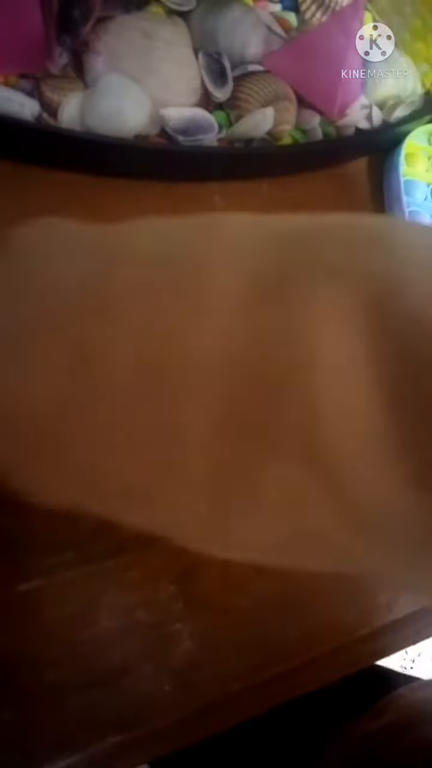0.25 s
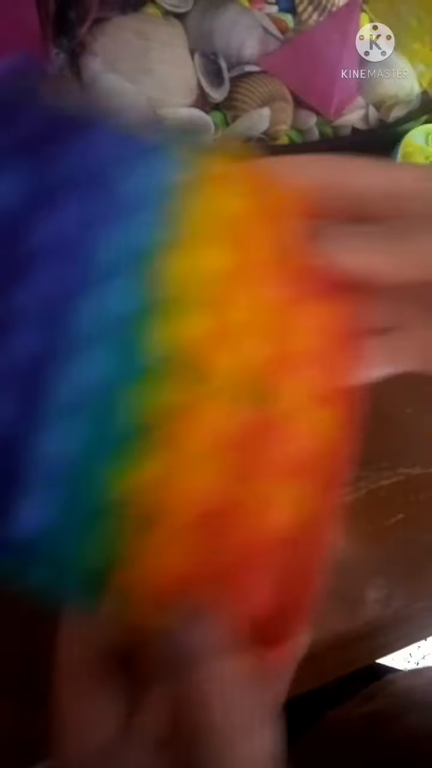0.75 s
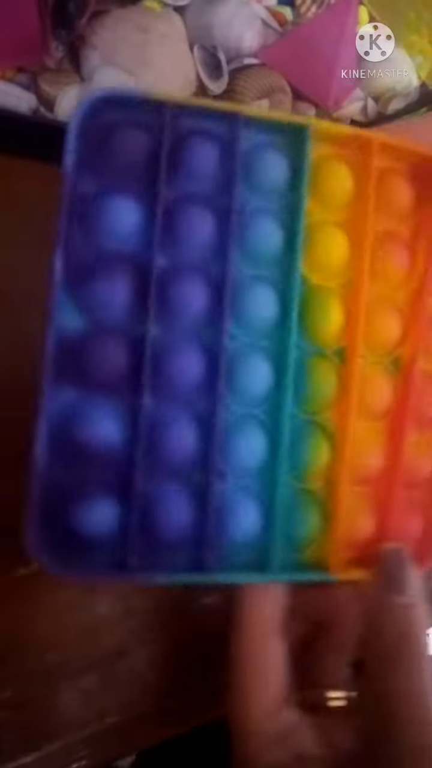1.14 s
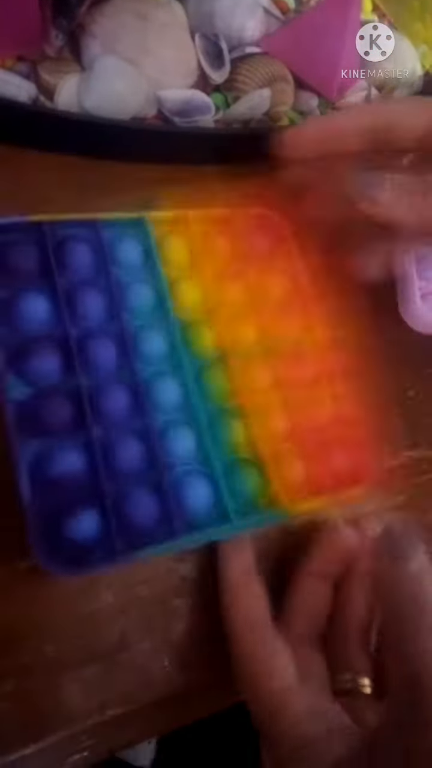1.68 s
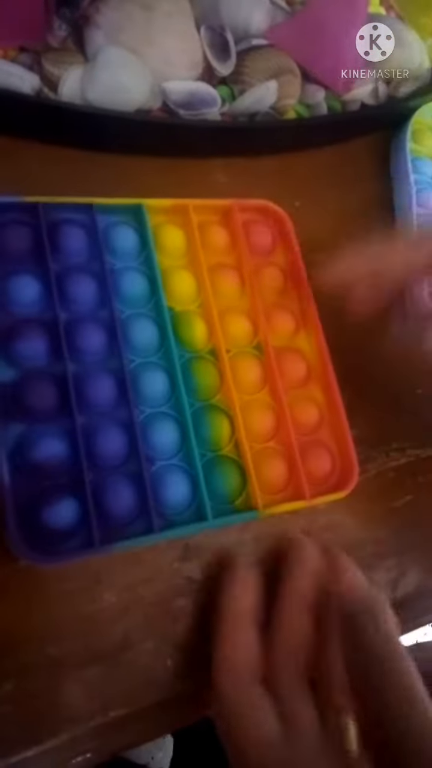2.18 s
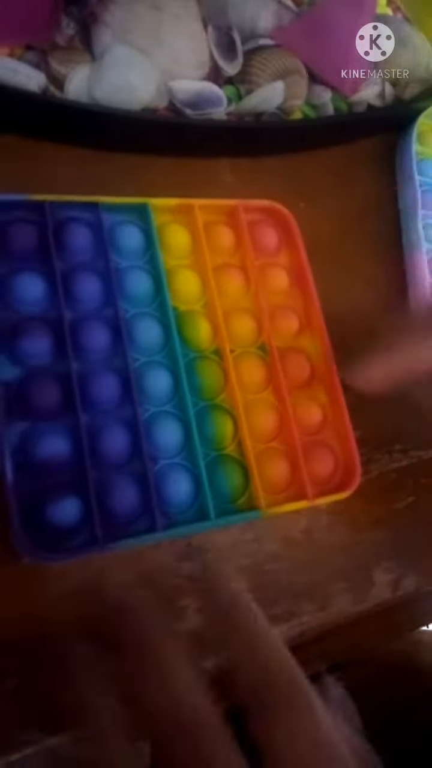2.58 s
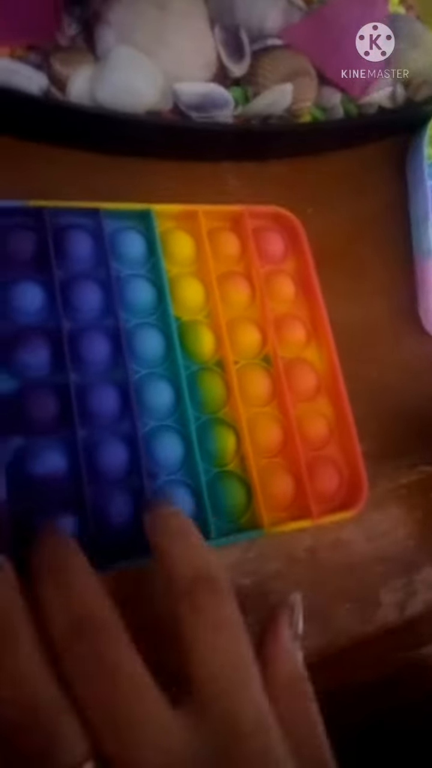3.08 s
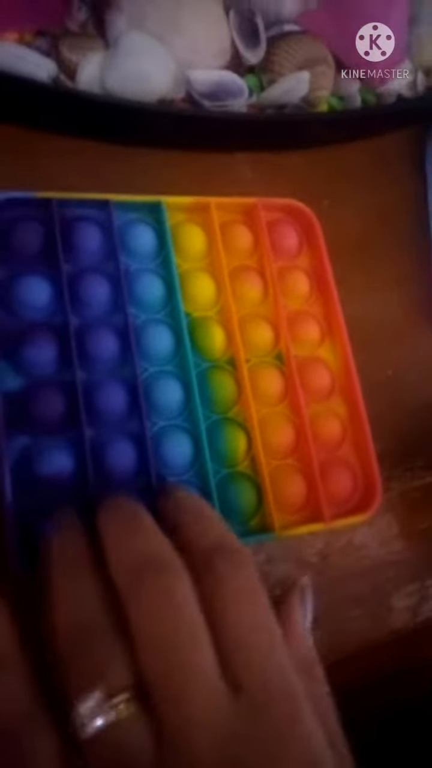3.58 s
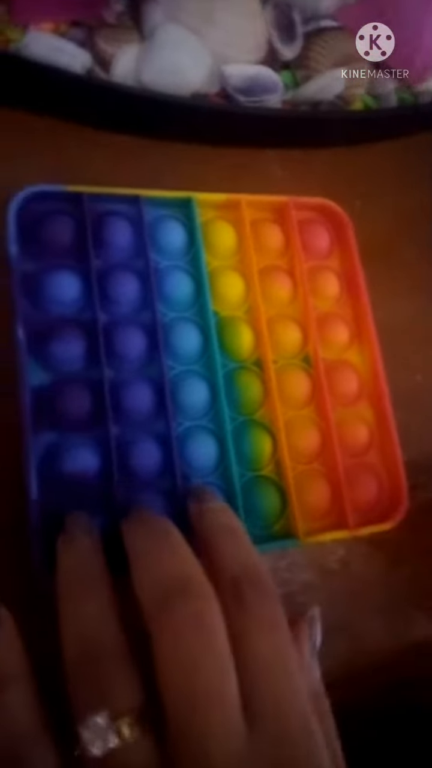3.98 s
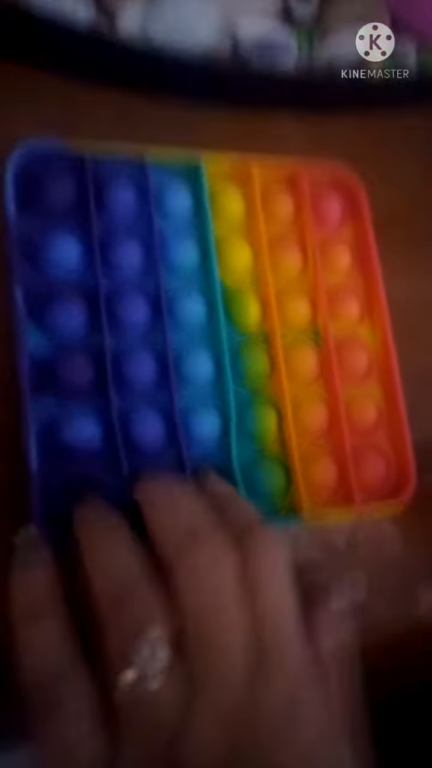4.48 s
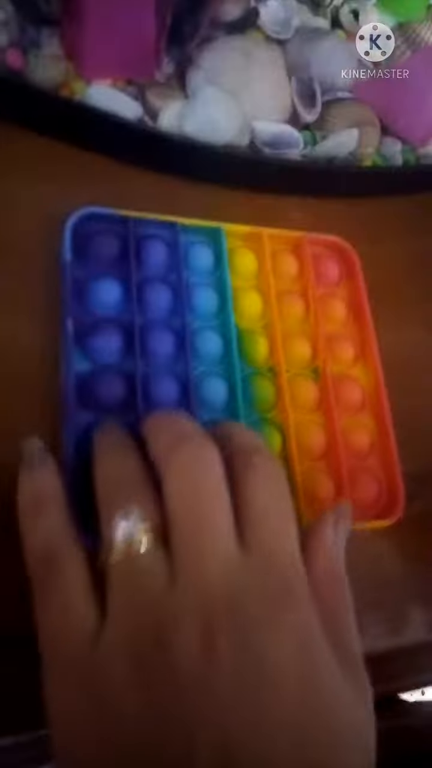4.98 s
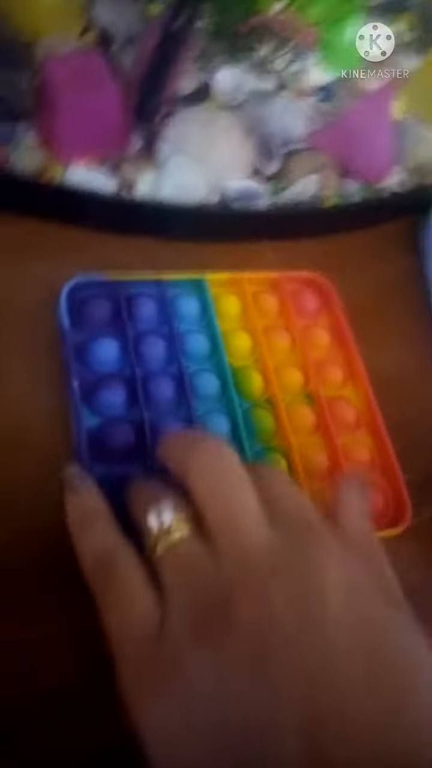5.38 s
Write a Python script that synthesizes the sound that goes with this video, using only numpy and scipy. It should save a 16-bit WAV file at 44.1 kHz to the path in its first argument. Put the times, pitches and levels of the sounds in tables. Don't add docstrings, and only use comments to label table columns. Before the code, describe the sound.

A rubbery toy squeaks while dragged off a wooden table, slaps down loudly, then its domes pop in two soft bursts.

```python
import sys
import numpy as np
from scipy import signal
from scipy.io import wavfile
from scipy.ndimage import uniform_filter1d

SR = 44100
rng = np.random.default_rng(int(sys.argv[2]) if len(sys.argv) > 2 else 0)


def field_ratio(decibels):
    return 10 ** (np.asarray(decibels, dtype=float) / 20)


def put_to_file(sound):
    columns = np.atleast_2d(sound).T
    safe = np.clip(columns, -1, 1)
    whole_steps = np.round(safe * 32767)
    wavfile.write(sys.argv[1], SR, whole_steps.astype(np.int16))


N = 248724


def evened(x):
    return x / np.sqrt(np.mean(x ** 2) + 1e-20)


def read(points, hz):
    f, value = np.transpose(points)
    return np.interp(np.log(hz + 1), np.log(f + 1), value)


def add(mix, start_s, sound):
    part = mix[round(start_s * SR):][:len(sound)]
    part += sound[:len(part)]


def unroll(rows):
    s, *columns = np.transpose(rows)
    t = np.arange(s[0], s[-1], 1 / SR)
    window = signal.windows.tukey(len(t), min(0.011 / (s[-1] - s[0]), 1))
    return s[0], window, [np.interp(t, s, column) for column in columns]


def noise(spectrum, count, patchy_db=2.0):
    hz = np.fft.rfftfreq(1024, 1 / SR)
    a, b, patches = rng.standard_normal((count // 256 + 5, 513, 3)).T
    patches = uniform_filter1d(patches, size=10, axis=0)
    patches = evened(uniform_filter1d(patches, size=12, axis=1))
    z = (a + 1j * b) * field_ratio(read(spectrum, hz)[:, None] + patchy_db * patches)
    return evened(signal.istft(z, nperseg=1024, noverlap=768)[1][:count])


def wander(count, size):
    drift = uniform_filter1d(rng.standard_normal(count), size=size)
    return evened(uniform_filter1d(drift, size=size))


def swell(start_s, length_s, peak_db, place, end_db):
    u = np.linspace(0, 1, 9)
    place = np.clip(place, 0.05, 0.95)
    away = np.where(u < place, 1 - u / place, (u - place) / (1 - place))
    return start_s + length_s * u, peak_db + end_db * away ** 2


def stroke(start_s, length_s, peak_db, place, *steady):
    s, db = swell(start_s, length_s, peak_db, place, end_db=-11.5)
    return np.transpose([s, db] + [value + 0 * s for value in steady])


def glide(start_s, length_s, first_hz, last_hz, peak_db, place):
    s, db = swell(start_s, length_s, peak_db, place, end_db=-5.5)
    return np.transpose([s, np.linspace(first_hz, last_hz, len(s)), db])


def whine(rows, waver, flutter_db, size):
    start_s, window, (hz, db) = unroll(rows)
    phase = 2 * np.pi * np.cumsum(hz * (1 + waver * wander(len(hz), size=size))) / SR
    level = field_ratio(db + flutter_db * wander(len(hz), size=size))
    return start_s, np.sqrt(2) * level * np.sin(phase) * window


def microphone_hiss():
    # hz, level_db per Hz
    hiss_colour = [(590, -33), (1000, -10.5), (1080, -0.5), (1240, -1), (1530, -11.5), (1700, -2.5),
                   (2080, -27.5), (2230, -10), (2650, -12), (2910, -9), (6420, -9), (8160, -22.5),
                   (13400, -21.5), (14700, -12.5), (15500, -8)]
    return field_ratio(-67 - 3.0) * noise(hiss_colour, N, patchy_db=0.6)


def street():
    # time_s, level_db
    traffic = [
        (0.0, 0),
        (1.6, -2),
        (2.3, -3),
        (4.3, -4.5),
        (4.6, -2),
        (5.64, -3),
    ]
    # hz, level_db per Hz
    street_colour = [(20, -42.5), (80, -18.5), (130, 0), (177, -1.5), (271, -3.5), (439, -10), (580, -12),
                     (700, -16), (1400, -22.5), (2060, -22.5), (3500, -27), (5960, -39.5), (8500, -65),
                     (11000, -80)]
    # hz, level_db per Hz
    rumble_colour = [(30, -20), (45, -3), (60, 0), (75, -2), (110, -9.5), (140, -35), (200, -53.5)]
    traffic_db = np.interp(np.arange(N) / SR, *np.transpose(traffic))
    out = field_ratio(-55.5 + traffic_db) * noise(street_colour, N, patchy_db=1)
    return out + field_ratio(-56.5 + 1.2 * traffic_db) * noise(rumble_colour, N, patchy_db=2.0)


def far_engine():
    # start_s, length_s, first_hz, last_hz, peak_db
    hums = [(2.268, 0.46, 208, 215, -59.5), (2.741, 0.7, 216.6, 223.6, -53.5),
            (3.598, 0.8, 217.3, 223, -56.5), (4.598, 0.3, 224.5, 229, -61),
            (.75, 0.46, 172.8, 171.6, -64.5), (1.26, 0.47, 170.1, 166.4, -58.5),
            (2.45, 1.14, 142, 146.3, -60.5), (0.0, 0.24, 101.8, 100, -55.5),
            (0.476, 0.56, 103.6, 104.9, -61), (1.326, 0.12, 99, 98, -55.5),
            (1.948, 0.43, 106.4, 105, -59.5), (2.398, 0.27, 106.7, 109.1, -63)]
    out = np.zeros(N)
    for row in hums:
        add(out, *whine(glide(*row, place=0.82), waver=0.008, flutter_db=0.5, size=2000))
    return out


def insects():
    # start_s, length_s, first_hz, last_hz, peak_db
    chirps = [
        (2.67, .16, 4630, 4720, -77),
        (2.72, 0.19, 4700, 4640, -72),
        (2.9, .1, 4720, 4640, -77),
        (3.22, 0.17, 4640, 4680, -75),
        (3.33, 0.14, 4720, 4740, -75),
        (0.352, 0.047, 4900, 4950, -80),
    ]
    low_chirp = (3.38, .23, 4480, 4495, -76.5)
    out = np.zeros(N)
    for row in chirps:
        add(out, *whine(glide(*row, place=0.28), waver=0.009, flutter_db=4.0, size=120))
    add(out, *whine(glide(*low_chirp, place=0.28), waver=0.003, flutter_db=5, size=200))
    return out


def finger_whistle():
    # start_s, length_s, first_hz, last_hz, peak_db
    whistles = [
        (2.93, 0.092, 1970, 1927, -72.5),
        (3.08, 0.11, 1905, 1900, -75),
        (3.23, 0.11, 1930, 1910, -73),
    ]
    out = np.zeros(N)
    for row in whistles:
        add(out, *whine(glide(*row, place=0.28), waver=0.009, flutter_db=4.0, size=120))
    return out


def rub(rows):
    # hz, level_db per Hz
    dull_colour = [(400, -23.5), (900, 3), (1500, -12.5), (1900, 1.5), (2300, 0.5), (2900, -0.5),
                   (3500, -5.5), (4300, -3.5), (4700, -33.5), (6500, -39), (9000, -50)]
    bright_colour = [(120, -57), (200, -3), (253, -15.5), (358, 1), (479, -4), (677, 0), (957, -4),
                     (1910, -2), (3180, -14), (6130, -10), (8510, -25.5), (13400, -26.5), (14700, -13),
                     (15500, -18.5)]
    start_s, window, (db, bright) = unroll(rows)
    dull = noise(dull_colour, len(db), patchy_db=1)
    sharp = noise(bright_colour, len(db), patchy_db=1)
    level = field_ratio(db + 0.18 * wander(len(db), size=200))
    return start_s, level * ((1 - bright) * dull + bright * sharp) * window


def hand_rubs():
    # start_s, length_s, peak_db, peak_place (0-1), brightness (0-1)
    strokes = [
        (0.478, 0.17, -66, 0.1, 0),
        (0.681, 0.67, -63.5, 0.18, 0.23),
        (2.92, 0.32, -64.5, 0, 0.18),
        (3.14, 0.36, -64.5, 0.3, 0.3),
        (5.165, 0.49, -62, 0.3, 0.58),
    ]
    # time_s, level_db, brightness (0-1)
    last_sweep = [
        (5.38, -62, 0.6),
        (5.43, -51.5, 0.58),
        (5.5, -51.5, 0.67),
        (5.56, -45, 0.7),
        (5.64, -57.5, 0.52),
    ]
    out = np.zeros(N)
    for rows in [stroke(*row) for row in strokes] + [last_sweep]:
        add(out, *rub(rows))
    return out


def clicks():
    # time_s, level_db, pitch_hz, t60_s (time to fall by 60 dB)
    click_rows = [(.303, -48, 1300, .04), (.311, -54, 1520, .04), (.3725, -48, 600, 0.02),
                  (1.7452, -31, 3240, .02), (1.7445, -38, 4800, .015), (1.7595, -34.5, 2190, .025),
                  (1.7595, -42, 3600, .01), (4.4652, -28, 2020, 0.016), (4.4651, -33, 3180, .015),
                  (4.4652, -36, 4970, .012), (4.4693, -37.5, 2980, 0.012), (4.4765, -29, 5150, 0.012),
                  (4.476, -37, 4330, .012), (4.563, -43, 2300, .005), (4.706, -49, 3020, .004),
                  (4.762, -52, 4000, 0.0045), (4.9105, -50, 2300, .005), (5.137, -40.5, 4490, 0.014),
                  (5.1385, -42.5, 5290, .012), (5.145, -47, 3330, 0.018), (5.135, -42, 2900, .01),
                  (5.3464, -34.5, 5090, 0.0069), (5.347, -47, 3000, 0.013), (5.349, -53, 2100, .015),
                  (5.3515, -53, 5800, .01), (5.3855, -45, 4500, 0.0034)]
    out, t = np.zeros(N), np.arange(1500) / SR
    for s, db, hz, t60 in click_rows:
        fade = field_ratio(db - 60 * t / t60) * np.minimum(t / 0.00064, 1)
        add(out, s, fade * np.sin(2 * np.pi * hz * t))
    return out


def lingering_rings():
    # time_s, level_db, pitch_hz, t60_s
    ring_rows = [(1.75, -35, 1130, .6), (1.755, -39, 1210, .5), (1.75, -36, 1315, .3),
                 (1.76, -36, 1012, .4), (1.76, -35, 410, .4), (1.75, -30, 723, .25), (1.75, -30, 804, .15),
                 (1.76, -33, 499.4, .37), (1.76, -36, 643, .45), (1.76, -47, 1870, .44),
                 (4.466, -30.5, 93, .3), (4.518, -30, 96, .36), (4.48, -37, 431, .4), (4.48, -36, 454, .3),
                 (4.48, -38.5, 532, .43), (4.48, -40.5, 779, .35), (4.52, -42, 933, .25),
                 (4.52, -40.5, 1105, .25), (4.52, -42, 1420, .08), (5.137, -28, 94.4, .22),
                 (5.15, -35, 531.7, .35), (5.15, -37, 565.4, .3), (5.15, -41, 708, .21),
                 (5.15, -43.5, 855, .3), (5.15, -48, 2085, .22), (5.19, -46, 1030, .12),
                 (5.19, -48, 1230, .12), (5.15, -44.5, 296, .5)]
    out, t = np.zeros(N), np.arange(30000) / SR
    for s, db, hz, t60 in ring_rows:
        throb_db = 4.5 * min(hz / 400, 1) ** 2 * wander(len(t), size=350)
        build = 1 - np.exp(-t / 0.008)
        add(out, s, field_ratio(db + throb_db - 60 * t / t60) * np.sin(2 * np.pi * hz * t) * build)
    return out


def tails(colour, build_s, count):
    # hz, t60_s
    room_t60 = [(80, 0.85), (250, 0.68), (600, 0.7), (1200, 0.68), (2200, 0.67), (3700, 0.5), (4600, .4),
                (7000, 0.27)]
    taps = np.zeros((count, SR))
    at = np.arange(300, SR - 20, 20)
    places = at + rng.integers(0, 20, (count, len(at)))
    np.put_along_axis(taps, places, rng.choice([-1., 1.], (count, len(at))), 1)
    hz, t, z = signal.stft(taps, SR, nperseg=512)
    fade = field_ratio(read(colour, hz)[:, None] - 60 * t / read(room_t60, hz)[:, None])
    tail = signal.istft(z * fade * np.minimum(t / build_s, 1), SR, nperseg=512)[1]
    return tail / np.linalg.norm(tail, axis=1)[:, None]


def room(train, colour, build_s):
    out, answers = np.zeros(N), tails(colour, build_s, count=5)
    for k, at in enumerate(np.flatnonzero(train)):
        add(out, at / SR, train[at] * answers[k % len(answers)])
    return out


def booming(rows, boom_db):
    return [(*row, boom_db) for row in rows]


def dome_puff(t, hz, t60):
    turns = hz * t + 0.21 * (1 - np.exp(-t * hz / 0.33))
    dome = -np.sin(2 * np.pi * turns) * field_ratio(-60 * t / t60) * (1 - np.exp(-(t * hz / 0.28) ** 2))
    return dome / abs(dome).max()


def wood_boom(t, modes):
    out = np.zeros(len(t))
    for hz, db, t60 in modes:
        share, detune = rng.standard_normal(2)
        out += field_ratio(db + 2.2 * share - 60 * t / t60) * np.sin(2 * np.pi * hz * (1 + 0.0095 * detune) * t)
    return out * np.minimum(t / 0.0023, 1)


def blows(rows, modes, snap_colour, snap_t60):
    body, air, train = np.zeros(N), np.zeros(N), np.zeros(N)
    t = np.arange(18000) / SR
    snap_t = t[:2048]
    for s, db, hz, snap_db, t60, boom_db in rows:
        snap = noise(snap_colour, 2048, patchy_db=-1.5)
        snap *= field_ratio(-60 * snap_t / snap_t60) * np.minimum(snap_t / 0.00076, 1)
        add(body, s, field_ratio(db) * (dome_puff(t, hz, t60) + field_ratio(boom_db) * wood_boom(t, modes)))
        add(air, s, field_ratio(snap_db + 7.0) * snap)
        train[round(s * SR)] = field_ratio(db)
    soft = signal.butter(6, 4500, fs=SR, output="sos")
    return signal.sosfilt(soft, body) + air, train


def slap_down():
    # time_s, dome_db, dome_hz, snap_db, dome_t60_s
    nudges = [
        (.1365, -37, 216, -74, 0.085),
        (.137, -52, 1120, -70.5, .012),
        (.1625, -43.5, 240, -63, 0.09),
        (.553, -38.5, 207, -59, 0.24),
        (1.372, -47.5, 200, -77, 0.016),
        (2.745, -50, 250, -90, 0.044),
    ]
    slap = [
        (1.7415, -47.5, 497, -57, 0.0094),
        (1.7434, -6.5, 1100, -43, 0.012),
        (1.7449, -13, 800, -48.5, 0.025),
        (1.7452, -20, 1360, -53.5, .025),
        (1.7494, -13, 1290, -40, 0.012),
        (1.7515, -18, 290, -46.5, .04),
        (1.7583, -16.5, 296, -37, 0.03),
        (1.7652, -22, 296, -59, 0.035),
        (1.7551, -12, 900, -49.5, .008),
    ]
    bounces = [
        (1.792, -21.5, 314, -54, 0.0068),
        (1.882, -31, 296, -69.5, 0.29),
        (1.893, -48, 296, -59.5, .069),
        (1.94, -40, 296, -68, 0.051),
        (2.03, -43.5, 300, -81, 0.19),
    ]
    # pitch_hz, level_db, t60_s
    wood = [(94.5, -20, 0.47), (200, -10, 0.075), (296, -8.5, 0.11), (432, -6, 0.056), (494, -9, 0.069),
            (610, -18.5, 0.11), (721, -5, 0.022), (800, -9, 0.042), (1155, -1.5, 0.036),
            (1415, -12.5, 0.033), (1580, -21, 0.054), (1844, -14, 0.031)]
    # hz, level_db per Hz
    snap_colour = [(880, -38), (1500, -3.5), (1850, -9.5), (2120, -10.5), (2330, -17), (4190, -22),
                   (6050, -41.5), (8040, -67.5), (9000, -69), (11700, -101), (19800, -120)]
    # hz, level_db
    wall_colour = [(80, -5), (300, 11), (420, 6), (700, 5), (950, 1.5), (1150, 7), (1400, 2), (1650, -5),
                   (1900, -5.5), (2300, -14), (3000, -19), (3800, -19.5), (4500, -39), (7000, -55.5)]
    rows = booming(nudges, -13.5) + booming(slap, -5) + booming(bounces, -13.5)
    slaps, train = blows(rows, wood, snap_colour, snap_t60=0.058)
    return field_ratio(8.5) * room(train, wall_colour, build_s=0.05) - slaps


def dome_pops():
    # time_s, dome_db, dome_hz, snap_db, dome_t60_s
    touches = [(3.4715, -50, 1200, -72, 0.0094), (3.477, -39, 288, -61, 0.12),
               (4.4045, -38, 418, -58, 0.013), (4.405, -51, 960, -69, 0.0096),
               (4.4445, -46.5, 327, -57, 0.0075), (4.456, -52, 684, -72, 0.02),
               (4.5625, -44, 530, -56, .01), (4.910, -53, 1100, -58, 0.0048),
               (4.99, -45, 256, -78.5, 0.052), (5.128, -45.5, 287, -77, 0.011),
               (5.3368, -39, 1510, -54.5, 0.0053), (5.3375, -46, 880, -70, 0.012),
               (5.338, -44, 520, -74, .06), (5.3458, -44, 300, -48, 0.04)]
    near_pops = [(4.4643, -12.5, 440, -31.5, 0.0054), (4.4715, -21, 380, -49, 0.022),
                 (4.4758, -13.5, 470, -34, 0.011), (4.4665, -25, 360, -59, 0.012),
                 (4.5145, -26, 444, -57, 0.065), (4.5215, -37, 1420, -50, 0.025),
                 (4.5203, -26, 1100, -44, 0.025), (4.5222, -31, 920, -54, .04),
                 (4.5265, -34, 1480, -57, 0.022), (4.523, -37.5, 3050, -60, 0.014),
                 (4.526, -21, 240, -45, 0.003)]
    far_pops = [(5.1346, -18, 460, -49, 0.0084), (5.1352, -37.5, 2100, -58.5, 0.009),
                (5.1404, -19, 532, -44.5, 0.022), (5.1408, -22.5, 2010, -49.5, 0.018),
                (5.1432, -32, 2030, -62, 0.022), (5.1412, -32.5, 2990, -58, 0.022),
                (5.1442, -18, 560, -59, 0.0029), (5.1455, -26.5, 1920, -52, 0.018),
                (5.1485, -24, 560, -60, 0.012), (5.149, -34, 1250, -55, .02), (5.138, -28, 800, -60, .02)]
    # pitch_hz, level_db, t60_s
    near_wood = [(130, -21, 0.05), (186, -6, 0.034), (275.4, 2.5, 0.079), (300, -10, 0.024),
                 (446, -12.5, 0.15), (530, -22, 0.079), (781, -9.5, 0.12), (1100, -13, 0.084),
                 (1600, -33, 0.05)]
    far_wood = [(130, -18, 0.05), (186, -15, 0.053), (287.4, 1, 0.1), (380, -20, .04), (519, -6, 0.07),
                (720, -13.5, 0.06), (1100, -27, 0.08), (1620, -29, 0.066), (2035, -28, 0.04)]
    # hz, level_db per Hz
    snap_colour = [(880, 0), (1500, 0.5), (2120, -7), (2530, -11), (3710, -12.5), (5200, -14.5),
                   (6390, -23.5), (8070, -48), (14000, -50.5)]
    # hz, level_db
    near_walls = [(80, 2), (300, 1.5), (560, 4.5), (800, 0.5), (1200, -6), (1600, -15), (2050, -17),
                  (2500, -20), (4000, -27.5), (7000, -48.5)]
    far_walls = [(80, -4), (280, 2), (410, 0), (550, 9.5), (700, -1), (1100, -5.5), (1600, -12),
                 (2050, -10.5), (2500, -19.5), (3000, -21), (4000, -31.5), (7000, -47.5)]
    near_rows = booming(touches, -10.5) + booming(near_pops, -12)
    near, near_train = blows(near_rows, near_wood, snap_colour, snap_t60=0.037)
    late, late_train = blows(booming(far_pops, -13.5), far_wood, snap_colour, snap_t60=0.049)
    wet = field_ratio(4.0) * room(near_train, near_walls, build_s=0.016)
    wet += field_ratio(6.5) * room(late_train, far_walls, build_s=0.0073)
    return near + late + wet


def scrape(rows):
    # pitch_hz, level_db, t60_s
    body_modes = [(105, -8, 0.24), (207, -6, 0.5), (308.7, -3, 0.23), (448, 2.5, 0.036), (560, 1, 0.06),
                  (768, -10, 0.096), (1020, -30, .03), (1424, -14.5, 0.042), (2066, -15, 0.043),
                  (2350, -18, 0.038)]
    start_s, window, (db,) = unroll(rows)
    hits = rng.random(len(db)) < 900 / SR
    slips = field_ratio(2.5 * rng.exponential(1, len(db))) * hits
    t = np.arange(3000) / SR
    body = sum(field_ratio(m_db - 60 * t / t60) * np.sin(2 * np.pi * hz * t) for hz, m_db, t60 in body_modes)
    return start_s, field_ratio(db) * evened(signal.fftconvolve(slips, body)[:len(db)]) * window


def chatter(rows):
    # hz, level_db per Hz
    slip_colour = [(200, -34), (450, -2), (700, -1), (1050, 6), (1500, -15), (2000, -12), (2650, -21),
                   (3200, -36), (4500, -80)]
    start_s, window, (db,) = unroll(rows)
    level = field_ratio(db + 2.0 * wander(len(db), size=60))
    return start_s, level * noise(slip_colour, len(db), patchy_db=6.0) * window


def gripped(rows):
    # time_s, overtone_tilt_db per overtone
    grip = [(.3, -20), (.335, -34), (.404, -15.5), (.42, 1.5), (.432, -4), (.447, -4.5), (.462, -3.5),
            (.478, -14), (.49, -15), (.5, -4), (.514, -12), (.53, -23)]
    at, hz, db = np.transpose(rows)
    s = np.linspace(at[0], at[-1], 30)
    return np.transpose([s, np.interp(s, at, hz), np.interp(s, at, db), np.interp(s, *np.transpose(grip))])


def squeak(rows):
    # hz, level_db
    sheet = [(300, 7.5), (600, 1.5), (830, -5), (1050, 11), (1250, 8), (1700, 2.5), (2100, -13),
             (2700, -17), (3100, -33)]
    rough = 0.18
    start_s, window, (hz, db, tilt_db) = unroll(rows)
    turns = np.cumsum(hz * (1 + 0.1 * rough * wander(len(hz), size=60))) / SR
    tone = np.zeros(len(hz))
    for k in range(7):
        flutter_db = 8.5 * rough * np.sqrt(k + 0.34) * wander(len(hz), size=70)
        level = field_ratio(tilt_db * k + read(sheet, hz * (k + 1)) + flutter_db)
        tone += level * np.cos(2 * np.pi * ((k + 1) * turns + rng.random()))
    return start_s, np.sqrt(2) * field_ratio(db) * tone * window


def drag_off():
    # time_s, slip_hz, level_db
    squeaks = [
        [(.293, 647, -54), (.303, 650, -45.5), (.31, 720, -50), (.318, 760, -47), (.332, 799, -46.5),
         (.345, 777, -54), (.365, 720, -58)],
        [(.398, 418, -55.5), (.42, 422.5, -43), (.434, 399, -44), (.447, 409.7, -43.5), (.465, 427.5, -49),
         (.48, 444, -46), (.52, 435, -47), (.539, 427, -52)],
        [(.435, 531, -50), (.46, 500, -48), (.474, 516.4, -37), (.485, 572, -54), (.499, 590, -48.5),
         (.515, 560, -49), (.53, 510, -48.5), (.55, 504, -55)],
    ]
    # start_s, length_s, peak_db, peak_place (0-1)
    loose_slips = [
        (0.41, 0.07, -44, 0.5),
        (0.482, 0.053, -60, 0.5),
    ]
    scrapes = [
        (0.127, 0.1, -50, 0),
        (.51, .17, -41, 1),
        (0.664, 0.052, -57.5, 0.3),
    ]
    # hz, level_db
    wall_colour = [(80, 8), (300, 9.5), (1200, 4.5), (2500, 9.5), (4000, -7), (5000, -1)]
    drag = np.zeros(N)
    for rows in squeaks:
        add(drag, *squeak(gripped(rows)))
    for row in loose_slips:
        add(drag, *chatter(stroke(*row)))
    for row in scrapes:
        add(drag, *scrape(stroke(*row)))
    tail = tails(wall_colour, build_s=0.0091, count=1)[0]
    return drag + field_ratio(-15.0) * signal.fftconvolve(drag, tail)[:N]


def scene():
    outside = street() + far_engine() + insects()
    hand = finger_whistle() + hand_rubs() + clicks()
    toy = lingering_rings() + slap_down() + dome_pops() + drag_off()
    return (outside + hand + toy)[None]


def roll_off(x):
    return signal.sosfilt(signal.butter(12, 15670, fs=SR, output="sos"), x)


def record(dry):
    bass_cut = signal.butter(3, 55.5, "highpass", fs=SR, output="sos")
    heard = signal.sosfilt(bass_cut, dry) + microphone_hiss()
    treble_edge = signal.firwin(511, 15600, window=("kaiser", 9), fs=SR)
    heard = signal.oaconvolve(heard, treble_edge[None], "same")
    return roll_off(heard)


dry = scene()
out = record(dry)
put_to_file(out)
```